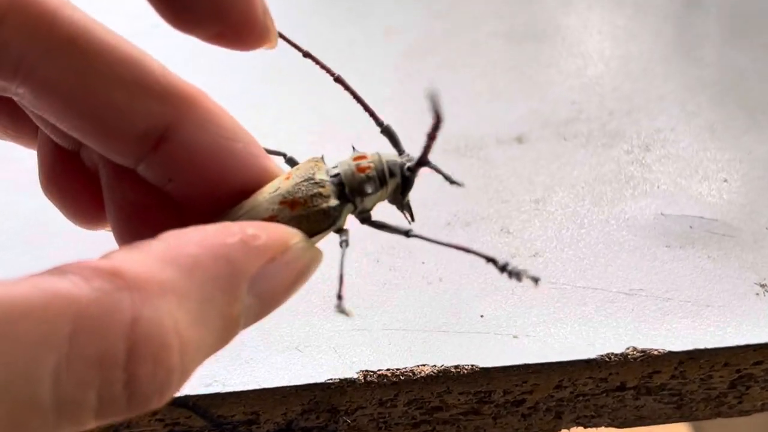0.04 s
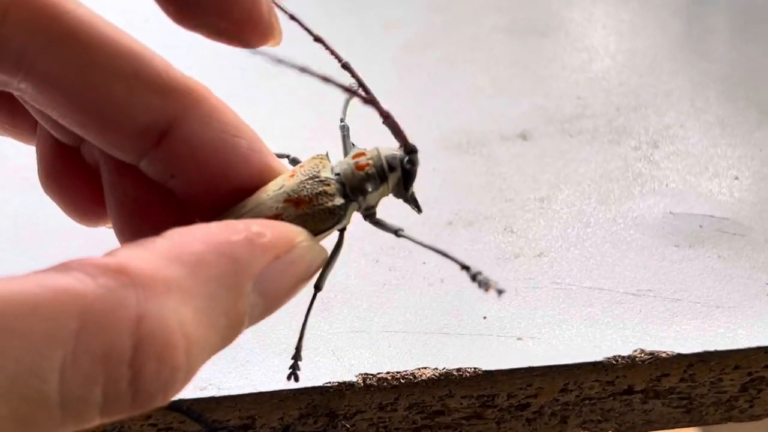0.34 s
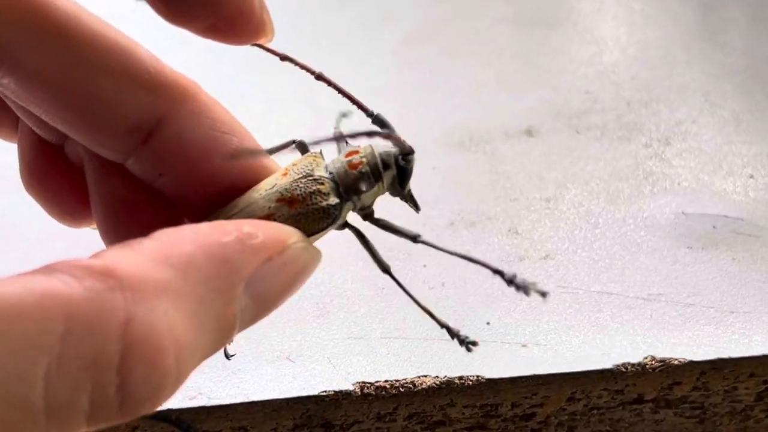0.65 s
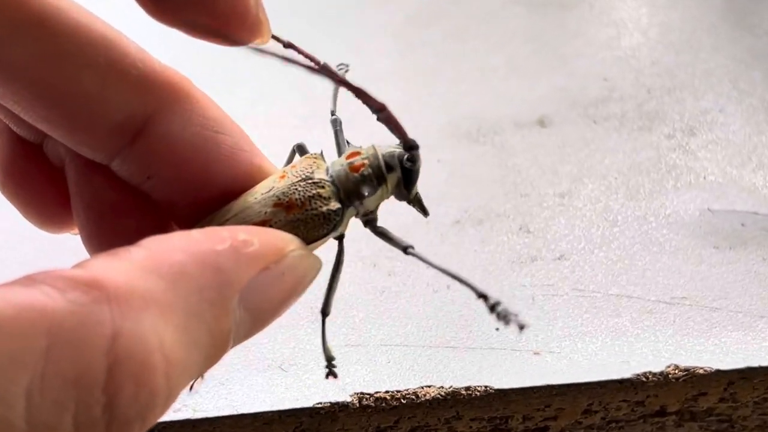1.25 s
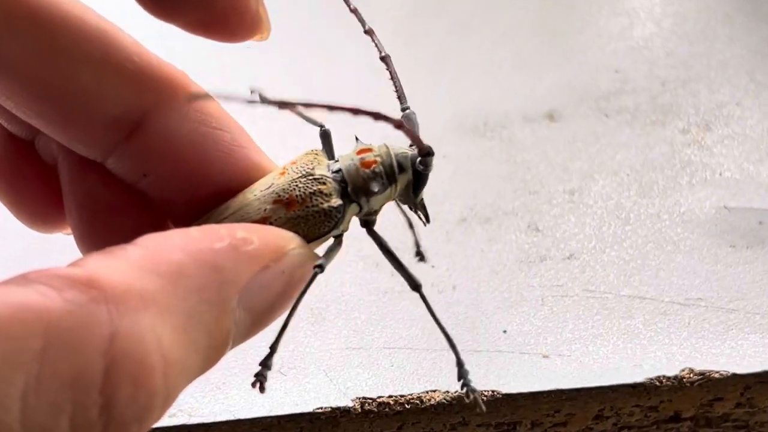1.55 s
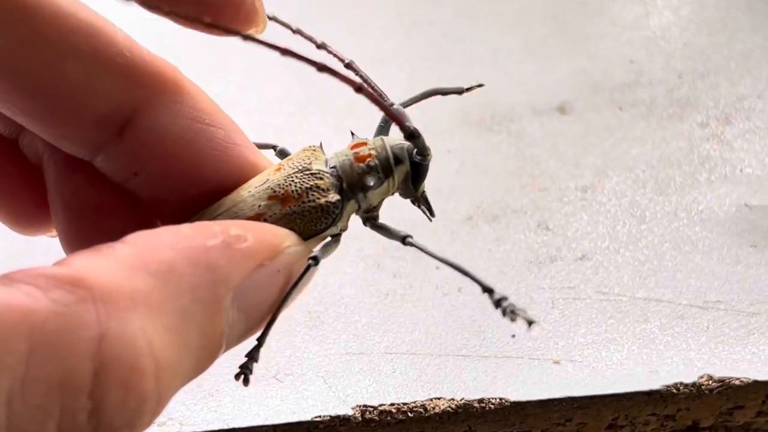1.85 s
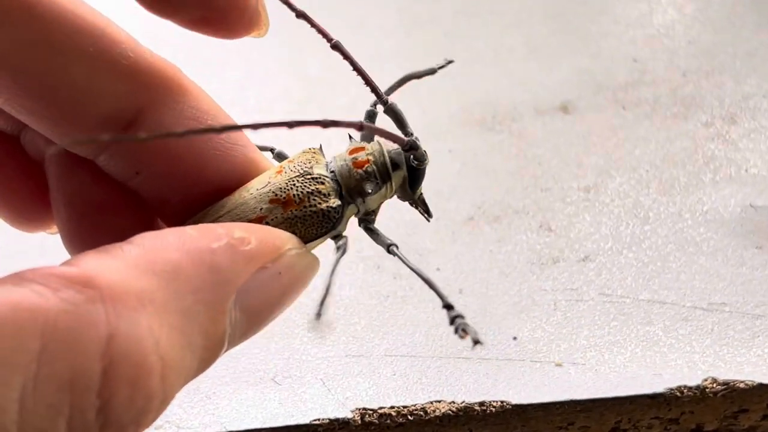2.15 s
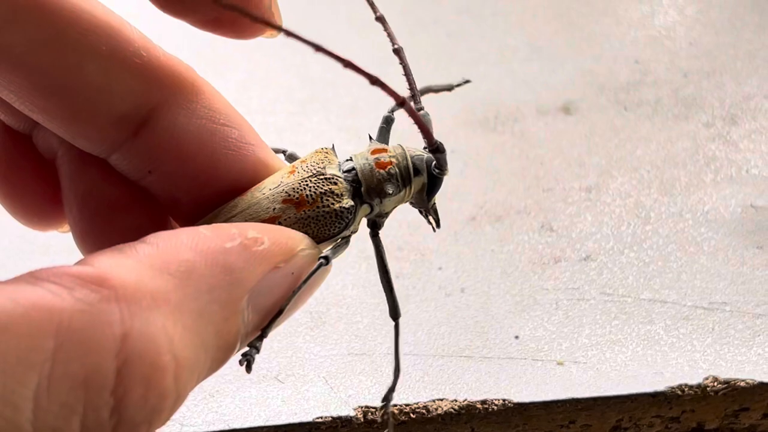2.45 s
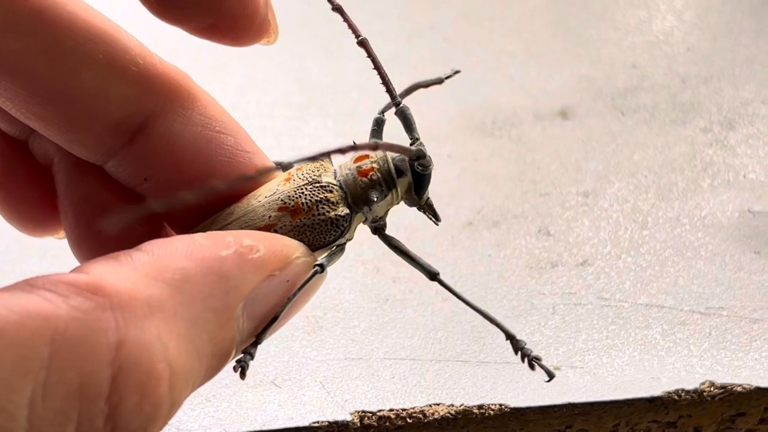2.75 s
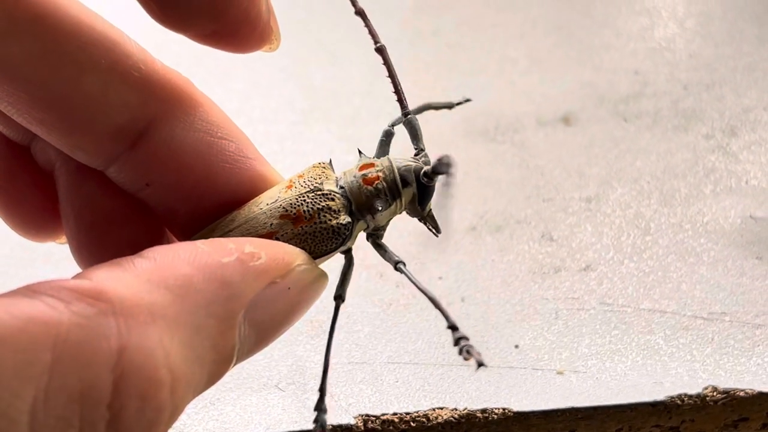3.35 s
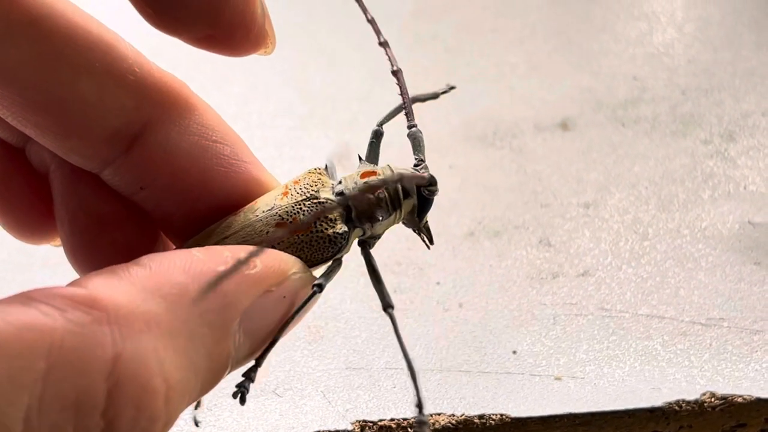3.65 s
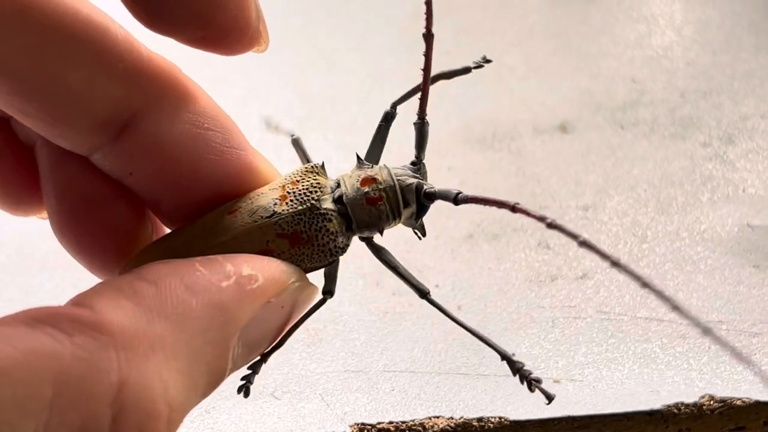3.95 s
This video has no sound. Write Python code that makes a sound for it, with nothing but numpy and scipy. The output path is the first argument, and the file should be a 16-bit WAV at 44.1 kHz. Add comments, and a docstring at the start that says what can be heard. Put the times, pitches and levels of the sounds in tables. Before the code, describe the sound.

Close, rhythmic squeaking comes from a hand-held beetle, going back and forth between a soft, ticking rasp and a louder, thin squeak. It repeats evenly throughout, over the soft air noise of a small room.

```python
"""A long-horned beetle, close by, stridulates: about twice a second its nodding thorax drags a scraper
over a ridged file. The quick stroke is a squeak of some 400 slips a second; the slow return sticks and
slips in a rasp of separate clicks. Each ridge struck is an impulse that excites the resonances of the
thorax and wing cases. A hand and a sill reflect the sound. Behind it lies a small, quiet room with soft
air noise, a low hum, a thin hiss and one faint, brief tone."""
import sys
import numpy as np
from scipy import signal
from scipy.fft import rfft, irfft
from scipy.io import wavfile
from scipy.ndimage import uniform_filter1d

SR = 44100
rng = np.random.default_rng(int(sys.argv[2]) if len(sys.argv) > 2 else 0)


def inscribe(sig):
    """Save sig as 16-bit PCM at rate SR to the path in sys.argv[1].

    A 1-D sig is mono; a 2-D sig holds one channel per row.
    Samples are clipped to [-1, 1] before scaling.
    """
    pcm = np.round(np.clip(np.atleast_2d(sig).T, -1, 1) * 32767)
    wavfile.write(sys.argv[1], SR, pcm.astype(np.int16))


N = 176400

# Noise of the still room. Each row: frequency in Hz, relative spectral density in dB.
AIR_SPECTRUM = [(20, -5), (35, -11), (52, 9), (85, 2), (120, -2), (200, -2.5), (300, -6.5), (600, -12.5),
                (1100, -13), (1650, -9), (2500, -17.5), (5000, -25), (7000, -30.5), (7550, -25.5),
                (8100, -35.5), (15500, -45)]
# Stereo width of that noise. Each row: frequency in Hz, side minus mid level in dB.
AIR_WIDTH = [(30, -24), (120, -6), (250, -9), (500, 1), (16000, -10)]
# Partials of the hum. Each row: frequency in Hz, level in dB before swell and channel balance.
HUM_PARTIALS = [(54, -75), (115, -68), (172, -71)]
# Slow swell of the hum. Each row: time in seconds, gain in dB.
HUM_SWELL = [(0, -1.5), (.6, -1), (1.3, 5), (2.3, 4.5), (2.9, 0), (4, -1)]
# Sound thrown back by fingers and sill. Each row: frequency in Hz, gain in dB.
SCATTER_GAIN = [(800, -6.5), (1500, -1.5), (2100, -15), (3000, -23.5), (4500, -16), (5800, -13),
                (7300, -3.5), (9000, -19.5), (11000, -14.5), (12800, -14.5), (14500, 3), (15700, -11)]
# Phase between the channels. Each row: frequency in Hz, lead of the left in radians.
CHANNEL_PHASE = [(100, 0), (2000, 0), (5100, -.1), (5900, -1.8), (6800, -3.1), (7700, -5.4), (8500, -6.2),
                 (10000, -6.5), (11900, -9.1), (13500, -9.7), (15400, -12.4)]
# Balance between the channels. Each row: frequency in Hz, left minus right level in dB.
CHANNEL_BALANCE = [(100, 9), (900, -1), (1450, 3), (1800, -5.5), (2100, -0.5), (16000, 0.5)]
# Response of thorax and wing cases in the return stroke. Each row: frequency in Hz, gain in dB.
RASP_BODY = [(600, -26), (1200, -18), (1600, -11.5), (1950, 3.5), (2650, -7.5), (3400, -4), (4300, -4.5),
             (5000, -5.7), (6000, -1), (7000, -6.5), (8300, -11.0), (9500, -12.5), (10500, -9),
             (11500, -2.5), (13000, -12.5), (14500, -22), (15600, -15.5)]
# Their response in the quick stroke. Each row: frequency in Hz, gain in dB.
SQUEAK_BODY = [(600, -24.5), (1000, -24), (1400, -9), (1700, -12), (1900, 2.2), (2100, -3), (2400, -8),
               (2750, -12.5), (3100, -6), (3500, -3), (4300, 0.5), (4900, -2.5), (5500, 2), (6500, -2.8),
               (8000, -5.5), (9700, -4.0), (11200, 1.2), (13400, -6), (15600, -9)]
# Course of the squeaks' highest treble. Each row: time in seconds, gain in dB.
TREBLE_GAIN = [(0, -3), (1.6, -1.5), (2.1, -1), (2.6, 2), (3.7, 2)]
# Places at which a stroke's slip rate is given. Each entry: fraction of the stroke.
STROKE_PLACES = [.05, .25, .5, .75, .92]
# Slow return strokes. Each row: start and end in seconds, relative level at the crest in dB, place of
# the crest from 0 to 1, rise in dB, fade in dB, slips per second at each of the five STROKE_PLACES.
RASP_STROKES = [(-0.17, 0.062, -45, 0.65, -1, 4.2, 161.4, 115.4, 119.8, 119.3, 113),
                (0.283, 0.508, -45.5, 0.38, 4, 3.9, 189.1, 119.6, 128.6, 122.1, 104.3),
                (0.759, 0.998, -44.5, 0.29, 2.5, 10, 149.3, 103.2, 140.4, 157, 154.6),
                (1.252, 1.493, -44, 0.38, 5, 7.6, 148.2, 94.7, 125.5, 133.4, 128),
                (1.762, 2.02, -45.5, 0.45, 6, 7, 169.2, 109.3, 111.8, 120.5, 96.2),
                (2.269, 2.51, -47, 0.35, 2.1, 3.5, 149.1, 129.8, 117.7, 127.6, 138.2),
                (2.781, 3.039, -47.5, 0.15, 2.3, 2.4, 175.6, 125.7, 134.8, 104.7, 97.4),
                (3.319, 3.555, -45.5, 0.14, 1, 5.6, 110.1, 104.2, 126.2, 102.8, 111),
                (3.819, 4.057, -44.5, 0.32, 1, 2.8, 150.2, 104.7, 100.2, 104.7, 138.7)]
# Quick strokes. Each row: the same quantities as in RASP_STROKES.
SQUEAK_STROKES = [(0.082, 0.25, -38.5, 0.56, 3.3, 13.7, 464.7, 411.6, 454, 535, 461),
                  (0.531, 0.717, -38.5, 0.46, 4.4, 8, 391, 390.7, 405.6, 427.5, 396.5),
                  (1.019, 1.221, -38.5, 0.51, 6.4, 12.2, 458.4, 400, 416, 508, 447),
                  (1.527, 1.729, -38.5, 0.51, 3, 16, 429.6, 402, 442, 460.4, 477),
                  (2.043, 2.226, -39, 0.51, 4, 7.7, 459, 419, 455.3, 441, 429.4),
                  (2.529, 2.748, -38.5, 0.55, 4.4, 11.0, 386.3, 352.4, 394.5, 444, 410),
                  (3.068, 3.266, -39, 0.63, 4.8, 6.1, 477, 389, 362.2, 404, 392.7),
                  (3.586, 3.771, -38.5, 0.54, 5.7, 6.2, 402, 382.7, 401.6, 424.5, 418)]

TIME = np.arange(N) / SR
BIN_HZ = np.arange(N // 2 + 1) * SR / N


def undb(db):
    """Amplitude grows tenfold for every 20 dB."""
    return 10 ** (np.asarray(db) / 20)


def unit(x):
    """Division by the rms gives a signal unit power."""
    return x / np.sqrt(np.mean(x ** 2))


def curve(points):
    """Interpolation on a log frequency axis gives a table's value at every bin."""
    hz, value = np.array(points, float).T
    return np.interp(np.log(BIN_HZ + 1), np.log(hz), value)


def colour(x, points):
    """Zero-phase filtering multiplies the spectrum by a gain curve, given in Hz and dB."""
    return irfft(rfft(x) * undb(curve(points)), N)


def drift(rate_hz):
    """Smoothing random steps gives a slow fluctuation of unit rms."""
    hold = int(SR / rate_hz)
    steps = np.repeat(rng.standard_normal(N // hold + 1), hold)
    return unit(uniform_filter1d(uniform_filter1d(steps, hold), hold)[:N])


def room_air():
    """Independent side noise, added in opposite polarity, partly decorrelates the channels."""
    mid, side = colour(rng.standard_normal((2, N)), AIR_SPECTRUM)
    return undb(-56.5) * unit(mid + colour(side, AIR_WIDTH) * np.array([[1], [-1]]))


def hum():
    """Random amplitude and frequency modulation makes three low partials waver."""
    swell_db = np.interp(TIME, *np.array(HUM_SWELL).T)
    sound = np.zeros(N)
    for hz, db in HUM_PARTIALS:
        amplitude = np.sqrt(2) * undb(db + swell_db + 1.9 * drift(5.9))
        sound += amplitude * np.sin(2 * np.pi * np.cumsum(hz + 4 * drift(14)) / SR)
    return sound


def brief_tone(hz=375, centre_s=1.12, half_width_s=.06):
    """A Gaussian envelope shapes a faint, wavering fundamental and its octave."""
    phase = 2 * np.pi * np.cumsum(hz + 8 * drift(29.72)) / SR
    envelope = np.exp(-((TIME - centre_s) / half_width_s) ** 2)
    return envelope * np.sqrt(2) * (undb(-63.5) * np.sin(phase) + undb(-63) * np.sin(2 * phase))


def thin_hiss(hz=7600, width_hz=350, end_s=2.9):
    """Noise confined to a narrow band is heard as a thin, nearly pitched hiss."""
    band = [(hz - width_hz, -45), (hz - width_hz / 2, 0), (hz + width_hz / 2, 0), (hz + width_hz, -45)]
    fade = np.clip((end_s - TIME) * 10, 0, 1)
    return undb(-67.5) * unit(colour(rng.standard_normal((2, N)), band)) * fade


def reflections(x, t60_s, gap_s):
    """Dense reflections act as convolution with exponentially decaying noise, one tail per channel."""
    t = np.arange(SR // 2) / SR
    onset = np.clip(t / gap_s - 1, 0, 1)
    tail = rng.standard_normal((2, len(t))) * undb(-60 * t / t60_s) * onset
    tail /= np.linalg.norm(tail, axis=1, keepdims=True)
    return signal.fftconvolve(x[None], tail, axes=1)[:, :N]


def stereo_image(x):
    """The two channels differ in phase and level by amounts that depend on frequency."""
    side = np.array([[.5], [-.5]])
    phase = side * curve(CHANNEL_PHASE)
    gain = undb(side * curve(CHANNEL_BALANCE))
    return irfft(rfft(x) * np.exp(1j * phase) * gain, N)


def ticks(times, sizes):
    """A band-limited impulse, here a windowed sinc, can fall between samples."""
    inside = (times > 0) & (times < (N - 10) / SR)
    centre = times[inside, None] * SR
    index = centre.astype(int) + np.arange(-7, 9)
    offset = index - centre
    pulses = np.sinc(offset) * np.cos(np.pi * offset / 16) ** 2 * sizes[inside, None]
    return np.bincount(np.clip(index, 0, N - 1).ravel(), pulses.ravel(), N)


def stick_slip(stroke, arch, stall, jitter, scatter_db):
    """Stick-slip friction gives slips (time, size) as pressure swells and fades; they slow at the end."""
    start, end, crest_db, crest, rise_db, fade_db, *rates = stroke
    t, slips = start, []
    for timing, strength in rng.standard_normal((160, 2)):
        place = (t - start) / (end - start)
        if place > 1:
            break
        if place < crest:
            drop_db = rise_db * (1 - place / crest) ** arch
        else:
            drop_db = fade_db * ((place - crest) / (1 - crest)) ** arch
        rate = np.interp(place, [*STROKE_PLACES, 1], rates + [rates[-1] * stall])
        amplitude = undb(crest_db - drop_db + scatter_db * strength)
        slips.append((t, amplitude * np.sqrt(SR / rate)))  # power is independent of the slip rate
        t += np.exp(jitter * timing) / rate
    return np.array(slips)


def scrape(slips, ridges_db, ridge_hz, spread, wander, uneven_db, grip):
    """A slip shares its energy among a few ridge impacts; hard slips skip slower and more evenly."""
    times, sizes = slips.T
    timing, strength = rng.standard_normal((len(times), len(ridges_db), 2)).transpose(2, 0, 1)
    slowing = np.interp(times, TIME, drift(24.94))[:, None]
    lightness = np.clip(np.log(np.quantile(sizes, .9) / sizes), 0, 1)[:, None]
    gaps_s = np.exp(spread * (1 + 2 * lightness) * timing + wander * slowing - grip * lightness) / ridge_hz
    impact_times = times[:, None] + np.cumsum(gaps_s, axis=1) - gaps_s[:, :1]
    shares = undb(np.array(ridges_db) + uneven_db * strength)
    shares /= np.linalg.norm(shares, axis=1, keepdims=True)
    return ticks(impact_times.ravel(), (sizes[:, None] * shares).ravel())


def rubbing(impacts, decay_s):
    """Friction noise follows each impact, its power decaying exponentially."""
    pole = np.exp(-1 / (decay_s * SR))
    power = signal.lfilter([1 - pole], [1, -pole], impacts ** 2 + 1e-18)
    return np.sqrt(power) * rng.standard_normal(N)


def shell(force, body, lag_s, bend_hz):
    """The shell's resonances ring after each tick; bending waves disperse, so the treble arrives first."""
    cepstrum = irfft(np.log(undb(curve(body))), N)
    ringing = np.exp(rfft(np.r_[cepstrum[0], 2 * cepstrum[1:N // 2]], N))  # minimum phase
    dispersion = np.exp(-2j * np.pi * lag_s * bend_hz * (1 - np.exp(-BIN_HZ / bend_hz)))
    return irfft(rfft(force) * ringing * dispersion, N)


def with_slip_energy(sound, slips):
    """Energy is a sum of squares: the sound is scaled to that of the slips that made it."""
    return sound * np.linalg.norm(slips[:, 1]) / np.linalg.norm(sound)


def rasps():
    """Slow stick-slip is heard as clicks: the scraper sticks, creeps, then jumps several ridges."""
    slips = np.vstack([stick_slip(stroke, arch=1.8, stall=.95, jitter=.07, scatter_db=1.25)
                       for stroke in RASP_STROKES])
    impacts = scrape(slips - [.0005, 0], ridges_db=[-7, 1, .5, -13], ridge_hz=4210,
                     spread=.079, wander=.033, uneven_db=1.66, grip=.13)
    creep = undb(-15) * rubbing(impacts[::-1], decay_s=.00033)[::-1]  # swells ahead of each impact
    force = impacts + creep + undb(-10.5) * rubbing(impacts, decay_s=.0019)
    return undb(-1.08) * with_slip_energy(shell(force, RASP_BODY, lag_s=.000912, bend_hz=4840), slips)


def squeaks():
    """In the quick strokes a fast, nearly periodic train of ticks fuses into a pitch at the slip rate."""
    slips = np.vstack([stick_slip(stroke, arch=4, stall=.6, jitter=.0502, scatter_db=.5)
                       for stroke in SQUEAK_STROKES])
    impacts = scrape(slips, ridges_db=[0, -16, -20], ridge_hz=4800,
                     spread=.31, wander=.073, uneven_db=2.5, grip=.068)
    force = impacts + undb(-8) * rubbing(impacts, decay_s=.0014)
    sound = with_slip_energy(shell(force, SQUEAK_BODY, lag_s=.001205, bend_hz=4270), slips)
    thorax_ring = undb(-7) * signal.lfilter(*signal.iirpeak(2050, Q=11, fs=SR), sound)
    treble = colour(sound, [(13800, -40), (14800, 0)])
    treble_gain = undb(np.interp(TIME, *np.array(TREBLE_GAIN).T))
    return undb(-1) * (sound + thorax_ring + treble * (treble_gain - 1))


def scene():
    """Superposition: the beetle's direct sound, its reflections and the room's background add."""
    squeak, rasp = squeaks(), rasps()
    beetle = squeak + rasp
    hand = reflections(undb(-14) * squeak + undb(-17.5) * rasp, t60_s=.036, gap_s=.00055)[0]
    sill = colour(reflections(squeak + undb(4) * rasp, t60_s=.012, gap_s=.00041), SCATTER_GAIN)
    room = undb(-17) * reflections(beetle, t60_s=.12, gap_s=.0027)
    air_balance, hum_balance = undb([[-.9], [.9]]), undb([[-2.2], [1.8]])  # left, right
    background = room_air() * air_balance + hum() * hum_balance + brief_tone() * air_balance + thin_hiss()
    return stereo_image(beetle + hand) + sill + room + background


def record(dry):
    """An elliptic low-pass filter cuts the treble steeply above 15950 Hz."""
    return signal.sosfilt(signal.ellip(10, .2, 70, 15950, fs=SR, output="sos"), dry)


dry = scene()
out = record(dry)
inscribe(out)
```